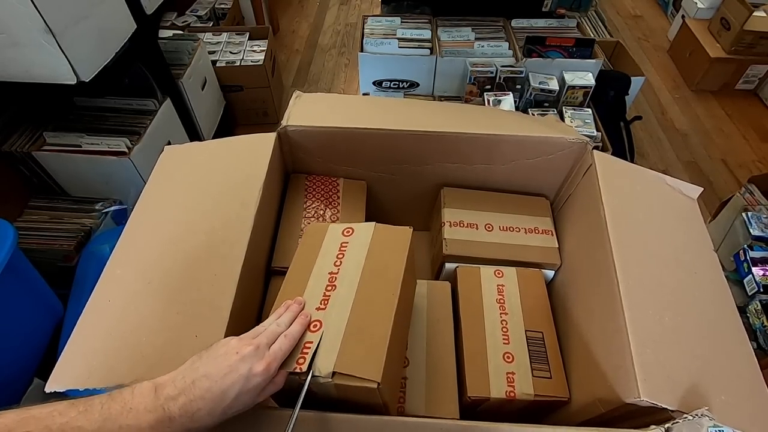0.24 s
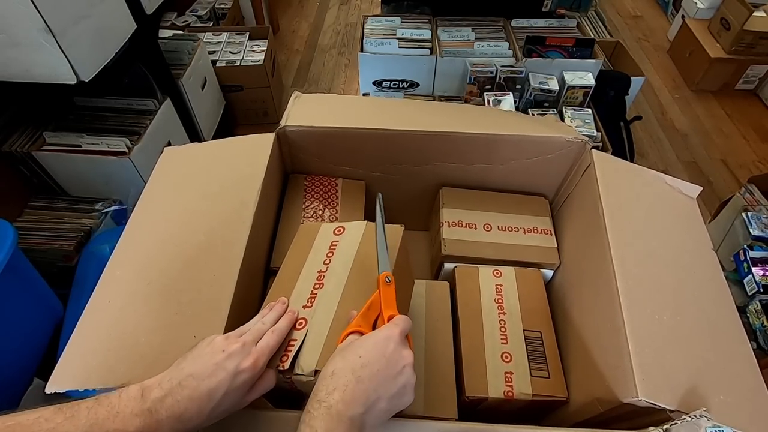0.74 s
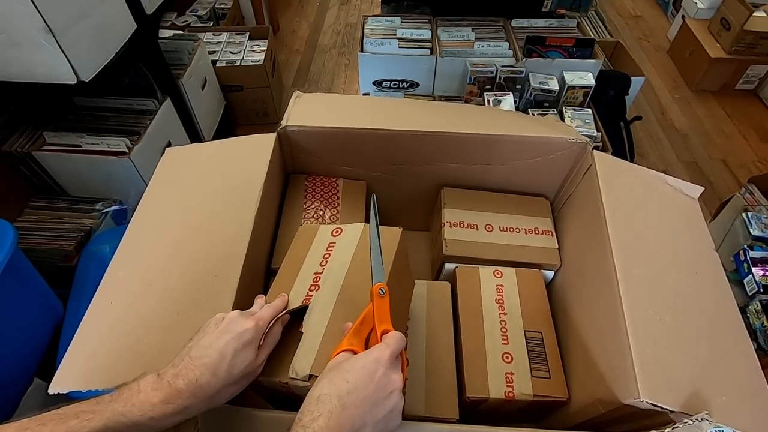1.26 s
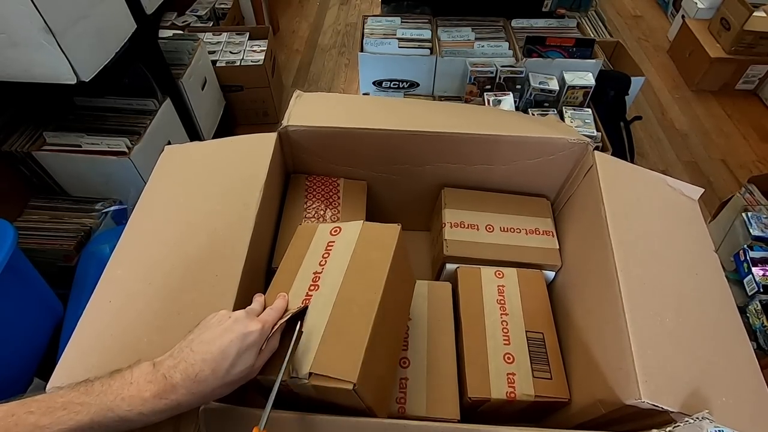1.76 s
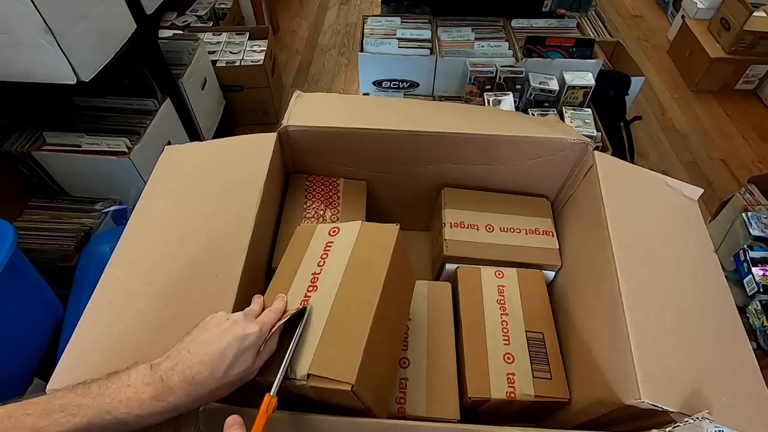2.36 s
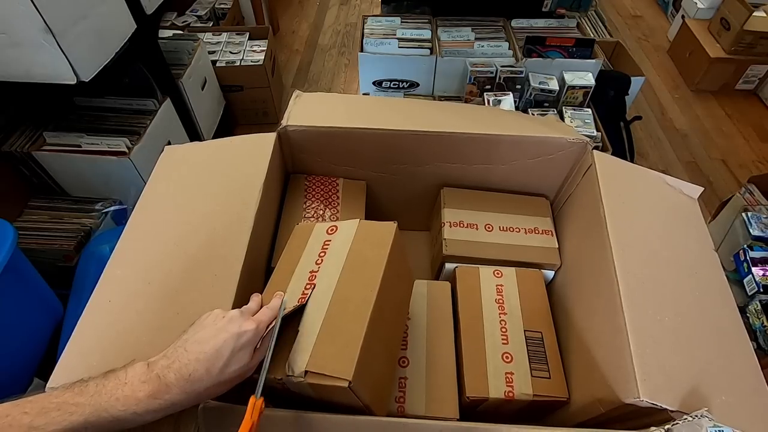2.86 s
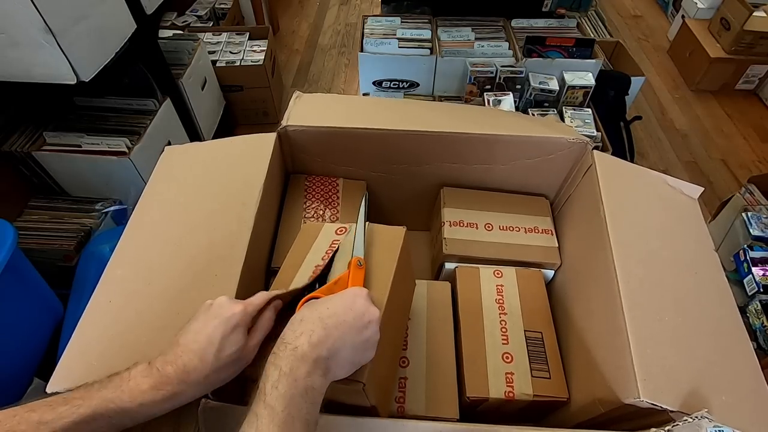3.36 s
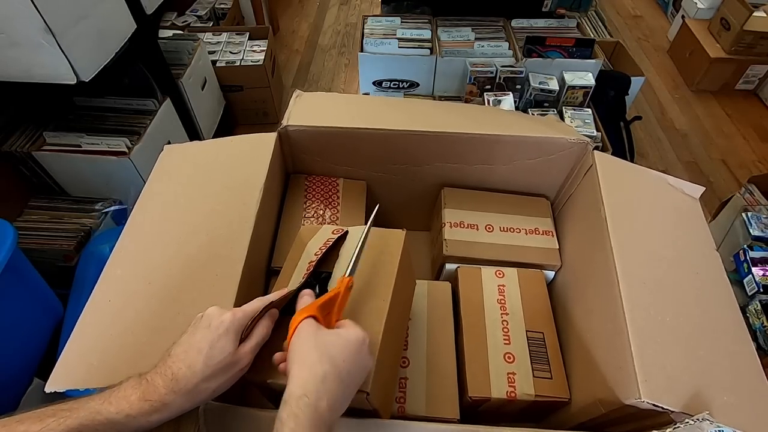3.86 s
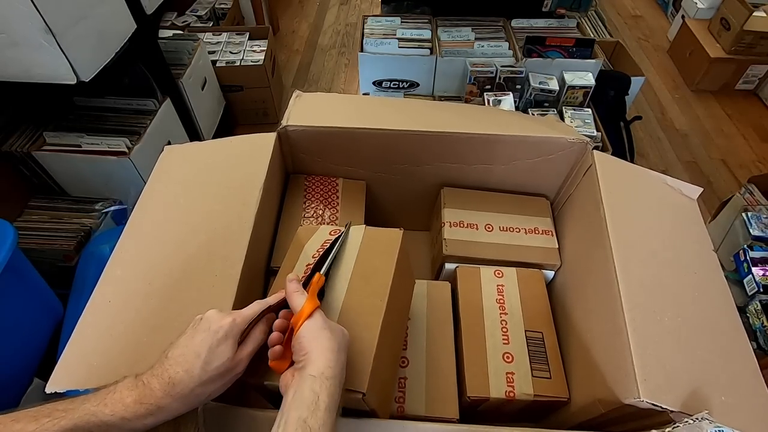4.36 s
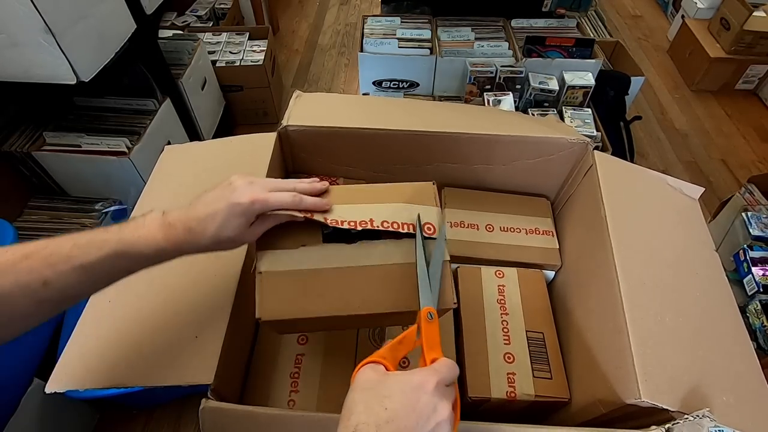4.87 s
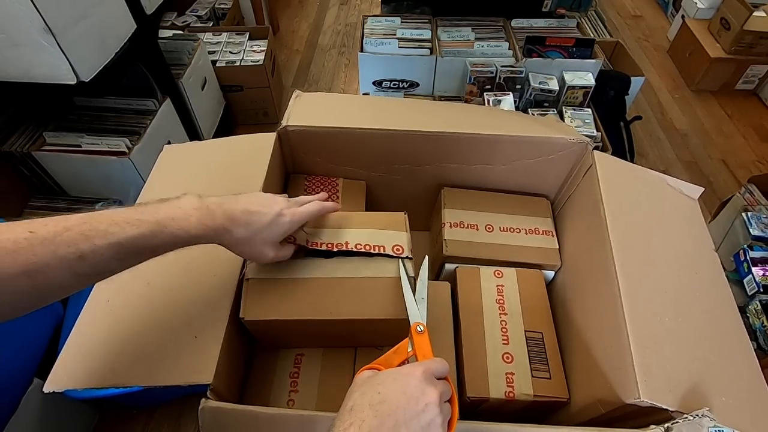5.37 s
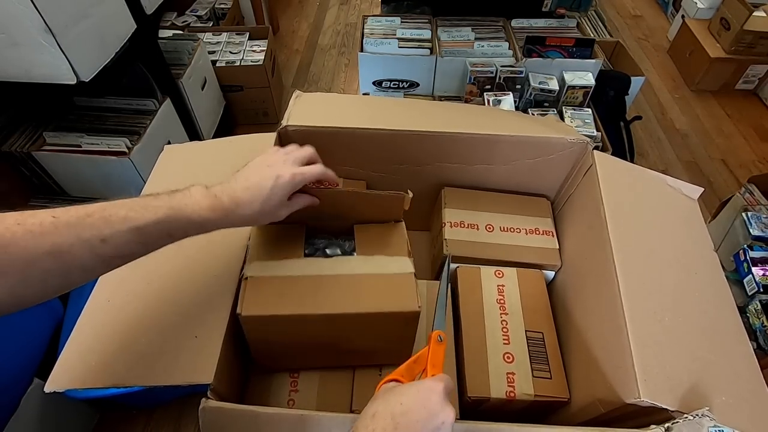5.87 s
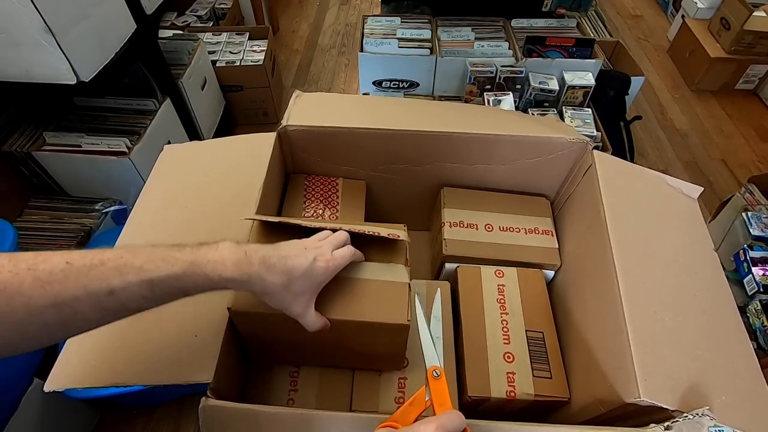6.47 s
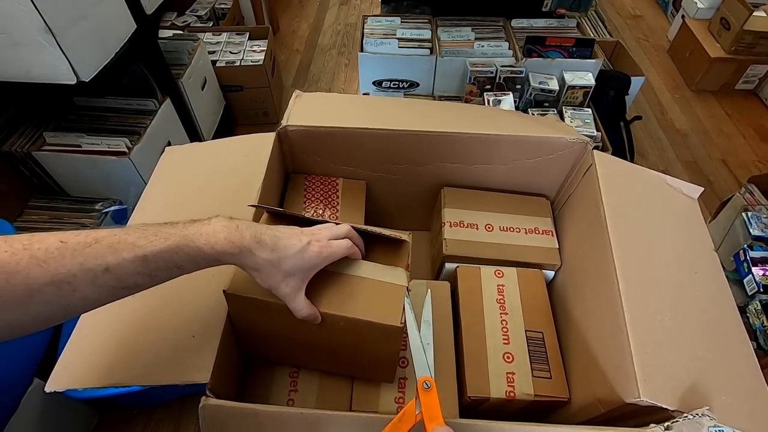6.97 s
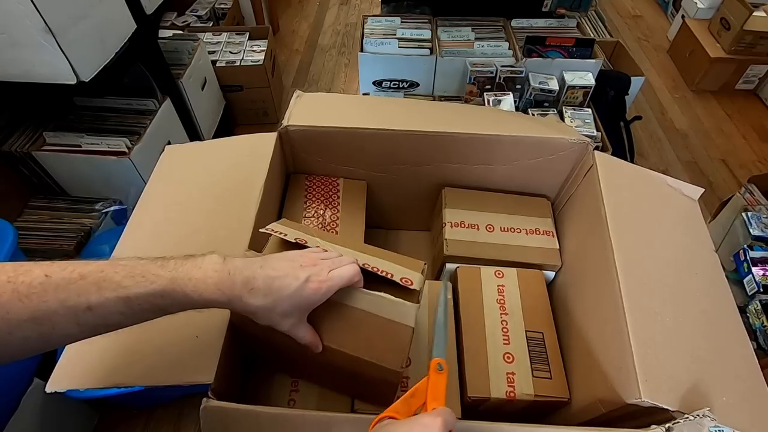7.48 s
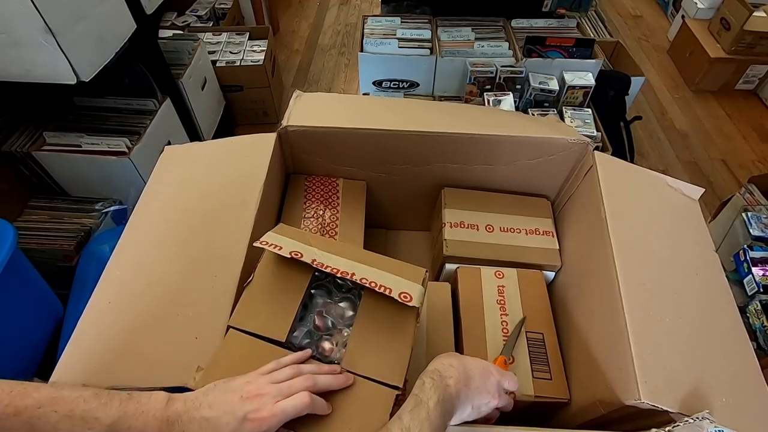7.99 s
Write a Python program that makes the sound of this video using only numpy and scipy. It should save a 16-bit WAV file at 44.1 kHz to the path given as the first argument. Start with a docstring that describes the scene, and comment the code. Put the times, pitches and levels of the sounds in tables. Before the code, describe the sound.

A small cardboard parcel is cut open inside a large carton in a quiet living room, heard close in stereo with short boxy echoes. A soft rub starts it, with dull knocks and a crisp snap by 0.2 s. Scraping follows around 0.8-1.1 s, then a stronger snap at 1.2. It is sparser until 2.5 s, with light ticks and brief rubs, then a knock and crunch at 2.8. The densest snipping and tearing comes at 3.4-3.5 s, with a hard hollow knock; more snaps around 4.2-4.55. The parcel is turned and bumps down loudly at 5.1 s, with low carton rumble. A crunchy snap and thump come at 5.7, then flap rubbing, small knocks and edge squeaks, a loud pop at 7.45, and final rustling and knocks to 8.2 s. A distant engine hum grows faintly from about 5.8, rises in pitch to 7.4, then eases down.

```python
"""First a soft rub of card, then a dull knock and light snaps: scissors slit the tape of a small parcel.
It lies in a large open carton in a living room; it is turned, bumps down, and its flaps are pulled open.
Snaps and tears are filtered bursts and grains, knocks are decaying panel tones, rubs and scrapes are
crowds of tiny slips. Carton and room echo them all. The carton rumbles, in quiet room noise, and an
engine outside, made of two gliding sine tones, hums faintly."""
import sys
import numpy as np
from scipy import signal
from scipy.fft import rfft, irfft, next_fast_len
from scipy.io import wavfile
from scipy.ndimage import uniform_filter1d, map_coordinates

SR = 44100
rng = np.random.default_rng(int(sys.argv[2]) if len(sys.argv) > 2 else 0)


def bounce(signal):
    """Save signal as a 16-bit WAV file at the path given by the first command-line argument."""
    frames = np.transpose(np.atleast_2d(signal))
    limited = np.clip(frames, -1, 1)
    pcm = np.round(limited * 32767).astype(np.int16)
    wavfile.write(sys.argv[1], SR, pcm)


N = 362943  # length of the scene [samples]

# All event levels below are relative: each layer also has its own overall trim.
# Engine outside: (time [s], firing rate [Hz], level [dB])
ENGINE = [(5, 50.57, -68), (5.8, 54.1, -51), (6.6, 62.37, -48), (7.1, 66.1, -47.5), (7.4, 69, -46.5),
          (7.8, 67.2, -43.5), (8.23, 63.5, -48.5)]
# Room resonances that lift the engine's tones: (centre [Hz], half width [Hz], lift [dB])
STANDING_WAVES = [(69.6, 6.9, 5), (125.6, 1.7, 13)]
# The parcel's weight shifts and the large carton sways: (time of the peak [s], rumble level [dB])
SWAYS = [(.84, -44.5), (1.68, -49), (4.55, -41.5), (4.86, -41.5), (5.24, -29), (5.83, -45), (6.22, -42.5),
         (6.67, -39), (7.6, -42.5), (8.13, -38)]
# Knocks on the parcel's walls: (time [s], level [dB], centre pitch [Hz], tick relative to the knock [dB])
KNOCKS = [(.071, -31.5, 320, -14), (0.139, -20.5, 386, -14), (0.176, -18, 385, 3), (.215, -26, 310, -17),
          (0.313, -31, 350, -12), (0.666, -37.5, 172, -5), (.744, -31, 167, 1.5), (.794, -32, 214, 1),
          (.972, -28.5, 151, -21), (1.183, -20, 200, -13), (1.442, -36, 380, -5), (1.98, -42, 170, 4),
          (2.426, -40.5, 400, 0), (2.506, -29, 790, -4), (2.529, -34, 121, -18), (2.773, -18, 189, 3.5),
          (2.871, -30, 234, -15), (3.28, -20.5, 250, 0), (3.501, -11, 750, -12), (3.748, -35, 400, 3),
          (3.97, -49, 397, 7.5), (4.145, -31.5, 164, -7.5), (4.426, -26.5, 240, -12),
          (4.455, -17.5, 240, -10), (4.701, -27.5, 160, -2), (4.724, -25, 269, -8),
          (4.926, -29.5, 221, 1.5), (5.0937, -5.5, 257, -9.5), (5.122, -23, 314, -20),
          (5.244, -22.5, 237, -8), (5.703, -15, 187.3, -25), (5.745, -17.5, 114, -19),
          (6.141, -25.5, 237, -14), (6.165, -21.5, 119, -22), (6.34, -32, 111, -13),
          (6.544, -18, 280, -4.5), (6.6588, -24, 450, -3.5), (6.986, -33, 112, -9.5), (7.29, -30, 900, -6),
          (7.316, -31, 380, -12), (7.4494, -10, 237, -14), (7.45, -11.5, 875, -15.5), (7.876, -29, 215, -2),
          (8.096, -18.5, 257, -1), (8.219, -36, 324, -10)]
# Cardboard panel tones: (pitch [Hz], strength [dB], time to fall by 60 dB [s])
PANEL_MODES = [(43.5, -7, 0.43), (80.2, -7.5, 0.21), (123.6, -6.5, 0.13), (172, -4.5, 0.13),
               (209.4, 4, 0.059), (252.7, 3, 0.056), (310, -2.5, 0.067), (380, 2, 0.074),
               (477, 13.5, 0.008), (561, -10, 0.069), (688, -2, 0.044), (847, 3, 0.033), (1140, -15, 0.019),
               (1220, -23.5, 0.029)]
# Rubs of blade and hands along the card: (start [s], length [s], hiss [dB], hollow body [dB])
RUBS = [(0, 0.44, -58, -52), (0.282, 0.078, -66, -54), (0.742, 0.43, -52, -49), (1.47, 0.13, -52, -48.5),
        (2.023, 0.15, -55, -58.5), (2.241, 0.1, -62, -63), (2.56, 0.17, -66, -55),
        (2.92, 0.25, -66.5, -57.5), (3.308, 0.086, -46, -41.5), (3.704, 0.17, -63.5, -51),
        (4.38, 0.052, -48, -46.5), (4.597, 0.18, -47.5, -45.5), (4.824, 0.163, -47, -60.5),
        (5.087, 0.263, -49, -55.5), (5.401, 0.4, -51.5, -51.5), (5.928, 0.11, -51.5, -50.5),
        (6.1, 0.273, -48, -48), (6.439, .51, -57, -50), (7.039, 0.334, -54, -46.5), (7.622, 0.24, -59, -49),
        (7.897, .33, -52, -44)]
# Short swelling scrapes of an edge along card: (time of the peak [s], half width [s], level [dB], squeak [Hz])
SCRAPES = [(.868, .026, -47, 4000), (0.959, 0.07, -45, 3930), (1.535, 0.058, -46.5, 3660),
           (2.13, 0.053, -61.5, 5030), (2.318, 0.04, -68, 5400), (2.678, 0.024, -54.5, 5200),
           (4.87, 0.014, -66, 6400), (5.26, .056, -53.5, 2980), (5.685, 0.034, -39, 2780),
           (6.228, 0.022, -42, 4340), (7.2, 0.056, -47, 2800), (7.283, 0.022, -41, 3030),
           (7.439, 0.032, -35.5, 2650), (7.671, 0.045, -47, 1690), (7.937, 0.024, -49, 2740),
           (8.05, 0.039, -47, 3060)]
# Crunches, where many fibres part in a row: (time [s], length [s], level [dB], brightness [dB per octave])
TEARS = [(.078, 0.035, -41, -0.5), (0.126, 0.027, -35, -1), (0.167, 0.0059, -23.5, -1.5),
         (0.179, .0064, -22.5, 1), (0.658, 0.039, -55, 4.5), (1.181, .012, -26, -0.5),
         (1.688, 0.032, -52.5, 3), (2.5067, 0.0032, -28.5, -2), (2.744, 0.021, -31, -4),
         (2.774, 0.0038, -27, 2.5), (2.868, 0.031, -43.5, 2), (3.419, 0.035, -27, -1),
         (3.473, 0.02, -24, -4.5), (3.755, 0.02, -44, 1), (4.182, 0.0056, -39, 0.5),
         (4.337, .014, -39.5, -1), (4.407, 0.039, -34.5, -1), (4.442, 0.009, -23.5, -5.5),
         (4.457, 0.0027, -20, -0.5), (5.715, .026, -25.5, 1.5), (6.812, 0.034, -42.5, -0.5),
         (6.894, 0.027, -40.5, -3.5), (7.443, 0.0023, -21.5, -8), (8.219, 0.02, -28, -7)]
# Snaps of tape and card under the blades:
# (time [s], level [dB], hollow body [dB], sharp edge [dB], ring [Hz])
SNAPS = [(0.0808, -33.5, -20, -23, 2560), (.182, -11.5, -13, -14, 3070), (0.2142, -15, -21, -30, 2750),
         (.859, -26.5, -31, -16.5, 3900), (0.958, -27, -32, -16, 3760), (1.054, -20, -6.5, -27, 3400),
         (1.1831, -6.5, -9, -12, 2470), (1.1923, -9.5, 1, -15, 2430), (1.1194, -35.5, -24, -11, 3220),
         (1.698, -30, -31, -2.5, 2000), (2.2084, -44.5, -22, -11, 4200), (2.487, -32, -14, -20, 3000),
         (2.5074, -14, -15, -23.5, 4200), (2.7445, -21, -33, -9, 2370), (2.777, -15, -25, -7, 3500),
         (2.8737, -24.5, -40, -30, 2580), (2.982, -28, -31.5, -10, 2480), (3.369, -10, -8.5, -31, 3120),
         (3.4202, -13.5, -17, -16.5, 4370), (3.426, -16.5, -5, -25.5, 2880), (3.4317, -10.5, -3, -33, 2220),
         (3.4423, -18, -11, -5, 2750), (3.4792, -4, -37, -20, 3220), (3.5008, -6, -0.5, -10, 2800),
         (4.0439, -35.5, -44, -16, 4270), (4.0748, -31.5, -43, -5.5, 4100), (4.1693, -26, 6, -36, 1880),
         (4.1826, -23, 10, -56, 1950), (4.4113, -15.5, -5.5, -37, 2460), (4.4418, -13, 2.5, -3, 3700),
         (4.4568, -10, -45, -34, 3740), (4.5357, -19.5, -10, -11, 3260), (4.5494, -20.5, -15, -13, 3120),
         (4.9823, -28.5, -21, -34, 3550), (5.1617, -26, 3, -35, 2000), (5.737, -20.5, -10, 12, 2900),
         (5.7401, -6, -8, -36.5, 2320), (6.0917, -32.5, 2, -12, 2120), (6.9085, -30.5, -17, -12, 3160),
         (6.4648, -36, -37, -30, 3300), (7.4476, -6, -0.5, -13, 2660)]

# Tone colour of the quiet room's air: (frequency [Hz], relative level [dB])
AIR_TONE = [(25, -28), (60, -9), (110, -8), (220, -1.5), (350, -6.5), (550, -15), (900, -15.5),
            (1500, -18.5), (4000, -23), (10000, -51), (15000, -83)]
# Tone colour of the carton's rumble: (frequency [Hz], relative level [dB])
RUMBLE_TONE = [(15, -40), (30, 2), (44, -6.5), (65, -5.5), (100, -12.5), (170, -20.5), (400, -40),
               (1500, -94.5)]
# Tone colour of the rattling contents: (frequency [Hz], relative level [dB])
RATTLE_TONE = [(100, -50), (350, 11.5), (580, 13.5), (900, -0.5), (1400, 6.5), (2500, -22), (5000, -27),
               (12000, -62.5)]
# Tone colour of a rub's hollow body: (frequency [Hz], relative level [dB])
BODY_TONE = [(60, -21), (160, 5.5), (330, 0.5), (550, -9.5), (950, -8.5), (1400, -14.5), (3000, -18),
             (8000, -58)]
# Tone colour of a rub's or scrape's surface hiss: (frequency [Hz], relative level [dB])
HISS_TONE = [(300, -17), (900, -0.5), (1600, -0.5), (2700, -0.5), (4000, -1.5), (6000, -4.5), (8000, -11.5),
             (9800, -14), (11500, -26.5), (15000, -32.5)]
# Tone colour of tearing fibres: (frequency [Hz], relative level [dB])
TEAR_TONE = [(60, -1), (250, 6), (550, -0.5), (950, 6.5), (1700, 3), (2700, 2), (4000, -2), (6000, -5),
             (9500, -18.5), (12000, -29), (16000, -45)]
# Tone colour of a snap: (frequency [Hz], relative level [dB])
SNAP_TONE = [(60, -61), (200, -18.5), (550, 0.5), (960, 12), (1350, 1), (2000, -1), (2700, -2),
             (3700, -1.5), (5000, -6.5), (7000, 1), (10000, -8), (12000, -27), (16000, -28)]

# Stereo spread of diffuse sound: (frequency [Hz], gain of the left-right difference [dB])
DIFFUSE_WIDTH = [(30, -5.5), (70, 3), (140, -2), (280, -11.5), (550, -4), (1000, -2), (2000, -2),
                 (4000, -7.5), (8000, 2.5), (13000, -2.5)]
# Stereo spread of direct sound: (frequency [Hz], gain of the left-right difference [dB])
NEAR_WIDTH = [(250, -36), (1000, -10.5), (2200, -16), (4000, -16), (8000, 1), (13000, -2)]
# How fast the room falls silent: (frequency [Hz], time to fall by 60 dB [s])
ROOM_T60 = [(100, 1), (400, 0.38), (1000, 0.42), (3000, 0.48), (8000, 0.46), (14000, 0.26)]
# Tone colour of the room's answer: (frequency [Hz], gain [dB])
ROOM_TONE = [(50, -21), (130, -8), (400, -8.5), (1000, -1), (3000, -4), (8000, 1.5), (14000, 5)]

TOP_HZ = 15830  # nothing is kept from here upwards
RUB_ATTACK_S, RUB_RELEASE_S = 0.042, 0.028  # every rub grips and lets go alike
JOLT_DB, JOLT_HZ = -19.5, 300  # every snap jolts the walls: level relative to the snap, centre pitch
TICK_BODY_DB, TICK_BODY_SLOPE = 17, 0.51  # a knock's tick: hollow body at 0 dB, dB lost per dB softer
TICK_EDGE_DB, TICK_HZ = -17, 2340  # the tick's sharp edge and ring


def amp(db):
    """Turn decibels into gain."""
    return 10 ** (np.asarray(db) / 20)


def unit(x):
    """Scale x to an rms of 1."""
    return x / np.sqrt(np.mean(x ** 2) + 1e-20)


def along(points, hz):
    """Read (frequency, value) points at hz, on a log frequency axis."""
    f, v = np.transpose(points)
    return np.interp(np.log(hz + 1), np.log(f), v)


def curves(rows):
    """Give one value per sample for each column after the time."""
    s, *cols = np.transpose(rows)
    return [np.interp(np.arange(N) / SR, s, c) for c in cols]


def wobble(rate):
    """A smooth random curve with the given number of random points a second."""
    points = rng.standard_normal(int(N * rate / SR) + 4)
    return map_coordinates(points, [np.arange(N) * rate / SR])


def add(track, s, sound):
    """Mix a sound into the track at time s."""
    i = int(np.clip(round(s * SR), 0, N - 1))
    track[i:i + len(sound)] += sound[:N - i]


def coloured(x, tone):
    """Filter x to (Hz, dB) points without shifting its phase."""
    n = x.shape[-1]
    m = next_fast_len(n + 8192)
    gain = amp(along(tone, np.fft.rfftfreq(m, 1 / SR)))
    return irfft(rfft(x, m) * gain, m)[..., :n]


def causal(tone_db, size=2048):
    """Minimum-phase filter for a dB function of frequency: it responds as promptly as it can."""
    cepstrum = irfft(np.log(amp(tone_db(np.fft.rfftfreq(size, 1 / SR)))))
    cepstrum[1:size // 2] *= 2
    cepstrum[size // 2 + 1:] = 0
    return irfft(np.exp(rfft(cepstrum)))


def peak_db(hz, centre_hz, height_db, octaves):
    """A smooth resonance peak in dB around one frequency."""
    return height_db * np.exp(-(np.log2((hz + 1) / centre_hz) / octaves) ** 2)


def stereo(mid, side, width):
    """Left and right from a common part and a difference of given width."""
    side = coloured(side, width)
    return np.array([mid + side, mid - side])


def grains(n, rate, spread_db):
    """Tiny slips at random moments, rate per second on average, of random size and sign."""
    chance, size, sign = rng.random(n), rng.standard_normal(n), rng.choice([-1, 1], n)
    return unit((chance < rate / SR) * sign * amp(spread_db * np.clip(size, -2, 2)))


def drone(tone):
    """Steady diffuse stereo noise of rms 1 in the given tone colour."""
    mid, side = coloured(rng.standard_normal((2, N)), tone)
    return unit(stereo(mid, side, DIFFUSE_WIDTH))


def quiet_room(level_db=-61):
    """The still air of the room, as steady coloured noise."""
    return amp(level_db) * drone(AIR_TONE)


def engine(level_db=-3, octave_db=-4, waver_db=3, drift=.016):
    """A distant engine speeds up and eases off; its lowest two tones swell at the room's resonances."""
    hz, db = curves(ENGINE)
    phase = 2 * np.pi * np.cumsum(hz * (1 + drift * wobble(9.9))) / SR

    def lift(f):
        return sum(lift_db / (1 + ((f - centre) / width) ** 2) for centre, width, lift_db in STANDING_WAVES)

    first = amp(lift(hz) + waver_db * wobble(24)) * np.sin(phase)
    octave = amp(lift(2 * hz) + octave_db + waver_db * wobble(17)) * np.sin(2 * phase)
    return np.sqrt(2) * amp(db + level_db) * (first + octave)


def rumble(rub, level_db=-1, sway_s=0.13, drag_db=-16, settle_s=0.093, rest_db=-78):
    """The large carton rumbles as rubbing drags on it, and swells each time the parcel's weight shifts."""
    t = np.arange(N) / SR
    keep = np.exp(-1 / (settle_s * SR))
    drag = amp(drag_db) * signal.lfilter([1 - keep], [1, -keep], np.abs(rub))  # smoothed rub loudness
    sway = sum(amp(db) * np.exp(-((t - s) / sway_s) ** 2) for s, db in SWAYS)
    left_right = amp([[-5], [2]])
    return amp(level_db) * (amp(rest_db) + drag + sway) * drone(RUMBLE_TONE) * left_right


def room(x, size=256):
    """Room echo, as mid and side: each band stores the energy it is fed and loses it at its own rate."""
    hz, t, z = signal.stft(x, SR, nperseg=size)
    fed = np.pad(np.abs(z) ** 2, ((0, 0), (2, 0)))[:, :len(t)]  # the walls answer two frames later
    kept = amp(-60 * t[1] / along(ROOM_T60, hz)) ** 2  # energy share left after one frame
    energy = np.array([signal.lfilter([1 - k], [1, -k], band) for k, band in zip(kept, fed)])
    noise = signal.stft(rng.standard_normal((2, N)), nperseg=size)[2]
    return signal.istft(noise / noise.std() * np.sqrt(energy), nperseg=size)[1][:, :N]


def carton(x, t60=0.067, first_wall=0.0022, count=24):
    """Quick wall echoes, as mid and side; new random ones are drawn for each of count equal stretches."""
    mid, side = np.zeros(N), np.zeros(N)
    t = np.arange(SR // 16) / SR
    for part in np.array_split(np.arange(N), count):
        walls = rng.standard_normal((2, len(t))) * amp(-60 * t / t60) * (t > first_wall)
        echoes = signal.fftconvolve(x[part][None], walls / np.linalg.norm(walls[0]), axes=1)
        add(mid, part[0] / SR, echoes[0])
        add(side, part[0] / SR, echoes[1])
    return np.array([mid, side])


def space(x, carton_db=-11, room_db=-6):
    """The near sound reaches left and right unalike; carton and room echoes follow it."""
    quarter_turn = np.imag(signal.hilbert(x, next_fast_len(N)))[:N]  # x shifted by a quarter cycle
    near = stereo(x, quarter_turn, NEAR_WIDTH)
    mid, side = amp(carton_db) * carton(x) + amp(room_db) * coloured(room(x), ROOM_TONE)
    return near + stereo(mid, side, DIFFUSE_WIDTH)


def knocks(level_db=-1, focus_db=6, reach_db=15, contact_cycles=0.51, detune=0.052, lag=0.00048,
           rattle_db=-25, rattle_t60=0.2, scatter_db=1.86):
    """Blows ring the panels, most near their centre pitch, and shake the contents; each tone varies a little."""
    out = np.zeros(N)
    t = np.arange(SR // 4) / SR
    hz, mode_db, t60 = np.transpose(PANEL_MODES)[:, :, None]
    loose = causal(lambda f: along(RATTLE_TONE, f))
    blows = [(s, db, centre_hz) for s, db, centre_hz, _ in KNOCKS]
    jolts = [(s, db + JOLT_DB, JOLT_HZ) for s, db, *_ in SNAPS]
    for s, db, centre_hz in blows + jolts:
        shift, strength = rng.standard_normal((2, len(hz), 1))
        off_centre_db = np.minimum(focus_db * np.log2(hz / centre_hz) ** 2, reach_db)
        weight_db = mode_db + scatter_db * strength - off_centre_db
        modes = amp(weight_db - 60 * t / t60) * np.sin(2 * np.pi * hz * (1 + detune * shift) * t)
        contact = 1 - np.exp(-(t * centre_hz / contact_cycles) ** 2)  # deeper blows build more slowly
        ring = modes.sum(0) * contact
        chatter = unit(signal.fftconvolve(grains(len(t), rate=360, spread_db=-9), loose)[:len(t)])
        rattle = contact * amp(rattle_db - 60 * t / rattle_t60) * chatter
        add(out, s + lag, amp(db + level_db) * (ring / np.abs(ring).max() + rattle))
    return out


def patchy(x, depth_db=5.0, size=256):
    """The colour of a rub shifts at random, in smooth patches over pitch and time."""
    z = signal.stft(x, nperseg=size)[2]
    field = uniform_filter1d(rng.standard_normal(z.shape), size=11, axis=0)  # smooth over pitch
    field = uniform_filter1d(field, size=14, axis=1)  # smooth over time
    return signal.istft(z * amp(depth_db * unit(field)), nperseg=size)[1][:N]


def sliding(hiss_db=-2, body_db=-1, catch_db=-7):
    """Card rubs in dense uneven slips, hissing at the surface and hollow in the box; edges catch at times."""
    t = np.arange(N) / SR
    hiss, body = np.zeros(N), np.zeros(N)
    for s, length, surface_db, hollow_db in RUBS:
        corners = [s - RUB_ATTACK_S, s, s + length, s + length + RUB_RELEASE_S]
        contact = np.interp(t, corners, [0, 1, 1, 0])
        hiss += contact * amp(surface_db + hiss_db)
        body += contact * amp(hollow_db + body_db)
    pressure = amp(3.2 * wobble(45) + 0.57 * wobble(220))
    fine_slips = pressure * grains(N, rate=4000, spread_db=3.5)
    catches = amp(catch_db) * grains(N, rate=49, spread_db=-2.0)
    slips = fine_slips + catches
    surface = unit(coloured(patchy(slips), HISS_TONE))
    coarse_slips = pressure * grains(N, rate=1200, spread_db=2.0)
    hollow = unit(coloured(slips + coarse_slips, BODY_TONE))
    return hiss * surface + body * hollow


def scrapes(level_db=0, squeak_db=6, squeak_octaves=0.18):
    """An edge's slips swell and fade, and crowd around one resonance of the sheet."""
    out = np.zeros(N)
    t = np.arange(-(SR // 6), SR // 6) / SR
    for s, width, db, squeak_hz in SCRAPES:
        sheet = causal(lambda hz: along(HISS_TONE, hz) + peak_db(hz, squeak_hz, squeak_db, squeak_octaves))
        slips = signal.fftconvolve(grains(len(t), rate=2700, spread_db=0.0), sheet)
        swell = amp(db + level_db) * np.exp(-(t / width) ** 2) * unit(slips[:len(t)])
        add(out, max(s + t[0], 0), swell[s + t >= 0])
    return out


def tears(level_db=0):
    """Runs of tiny fractures as the blade drives through fibres."""
    out = np.zeros(N)
    t = np.arange(SR // 10) / SR
    for s, length, db, tilt_db in TEARS:
        length = max(length, .002)
        run = grains(len(t), rate=3500, spread_db=3) / (1 + (t / length) ** 8)  # stops soon after length
        fibres = causal(lambda hz: along(TEAR_TONE, hz) + tilt_db * np.log2(np.maximum(hz, 300) / 2500))
        crunch = signal.fftconvolve(run, fibres)
        add(out, s, amp(db + level_db) * np.sqrt(length * SR) * crunch / np.linalg.norm(crunch))
    return out


def snaps(level_db=1, flutter=0.21, flutter_t60=0.015, lead_in=0.0013, ring_db=6, ring_octaves=0.36,
          lag=0.001262):
    """Some fibres give first, then a sharp release rings the strip and flutters; knocks tick the same way."""
    out = np.zeros(N)
    t = np.arange(-(SR // 100), SR // 25) / SR
    ticks = [(s, db + tick_db, TICK_BODY_DB + TICK_BODY_SLOPE * db, TICK_EDGE_DB, TICK_HZ)
             for s, db, _, tick_db in KNOCKS]
    for s, db, body_db, edge_db, ring_hz in list(SNAPS) + ticks:
        fade = amp(-60 * np.maximum(t / flutter_t60, -t / lead_in))  # rises before the release, then dies
        release = flutter * rng.standard_normal(len(t)) * fade
        release[t == 0] = 1
        shade = [(900, body_db), (1800, 0), (4500, 0), (7000, edge_db)]
        strip = causal(lambda hz: along(SNAP_TONE, hz) + along(shade, hz)
                       + peak_db(hz, ring_hz, ring_db, ring_octaves))
        crack = signal.fftconvolve(release, strip)
        add(out, s + t[0] + lag, 4 * amp(db + level_db) * crack / np.linalg.norm(crack))
    return out


def scene():
    """The work on the parcel, over the carton's rumble, the engine and the quiet room."""
    rub = sliding()
    work = space(snaps() + tears() + knocks() + scrapes() + rub)
    return work + rumble(rub) + engine() + quiet_room()


def record(dry):
    """Cut off everything from the top frequency upwards."""
    m = next_fast_len(N + 8192)
    return irfft(rfft(dry, m) * (np.fft.rfftfreq(m, 1 / SR) < TOP_HZ), m)[:, :N]


dry = scene()
out = record(dry)
bounce(out)
```